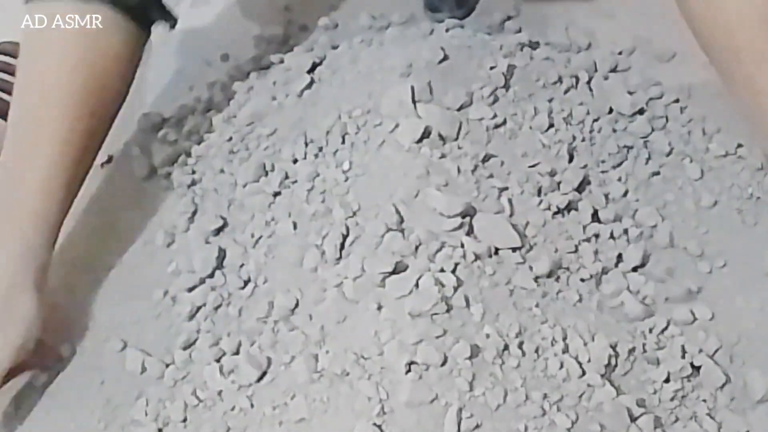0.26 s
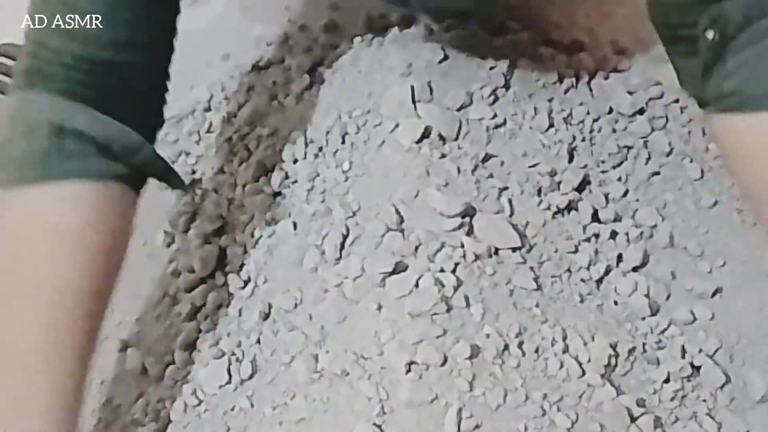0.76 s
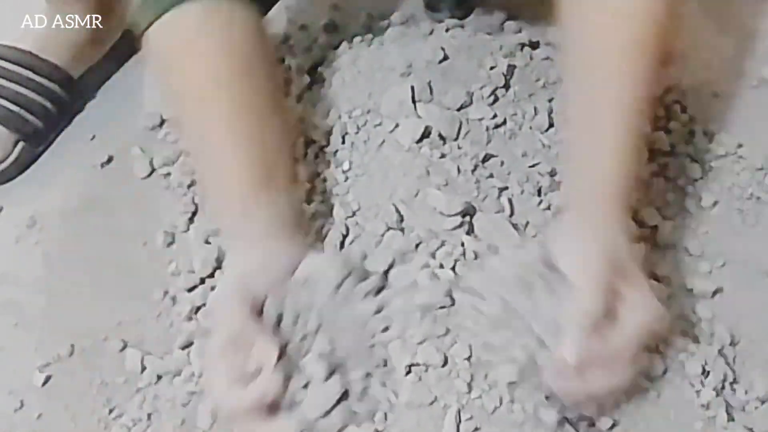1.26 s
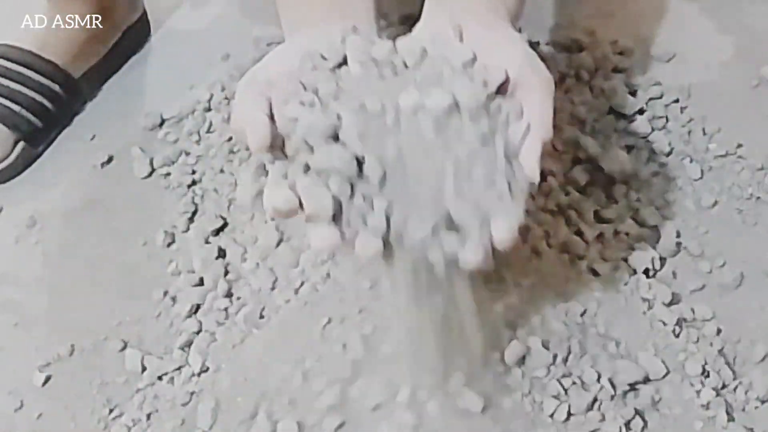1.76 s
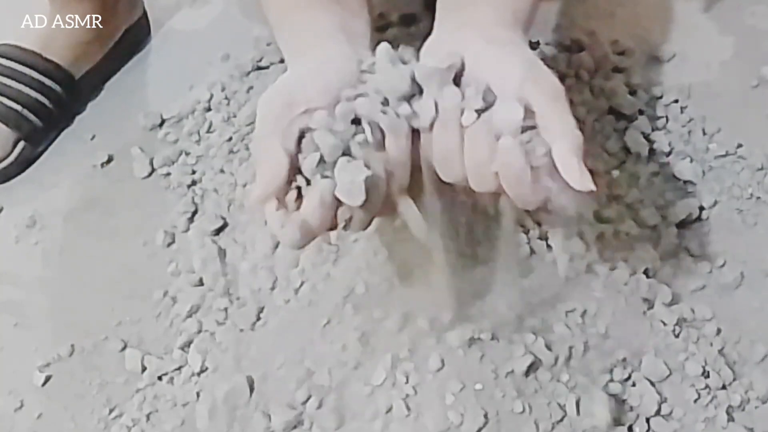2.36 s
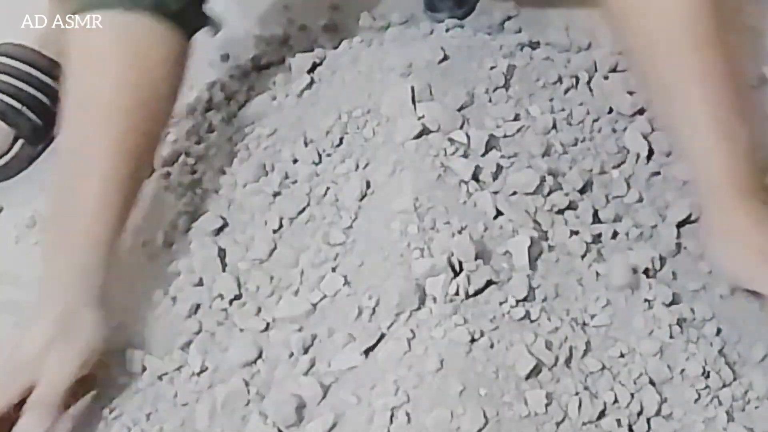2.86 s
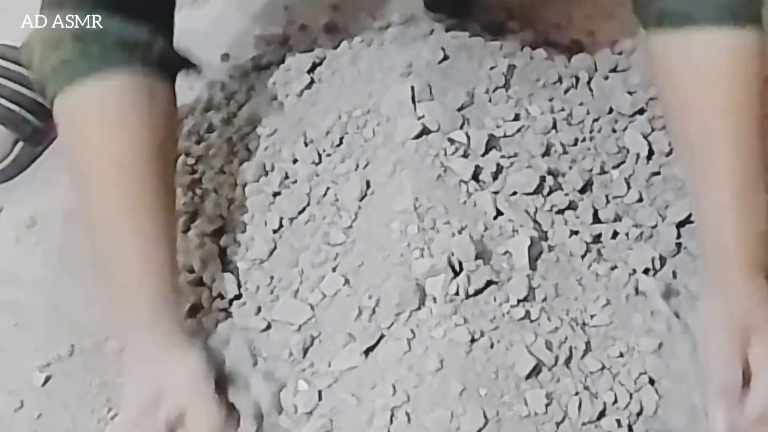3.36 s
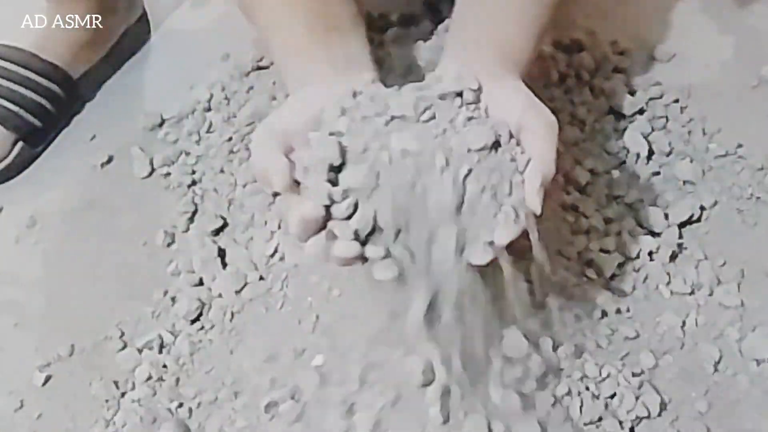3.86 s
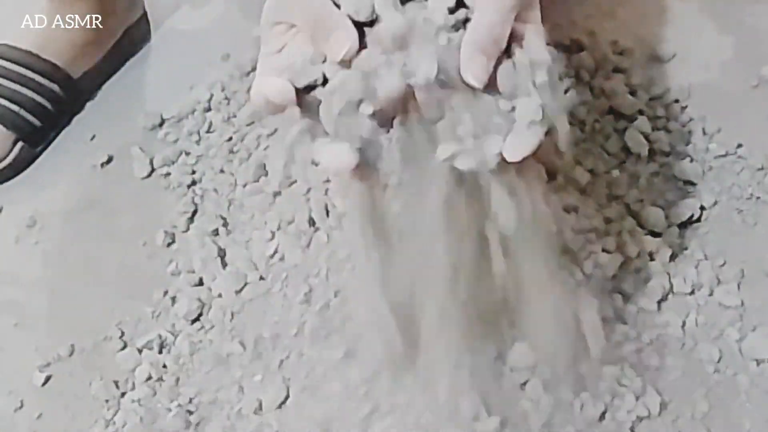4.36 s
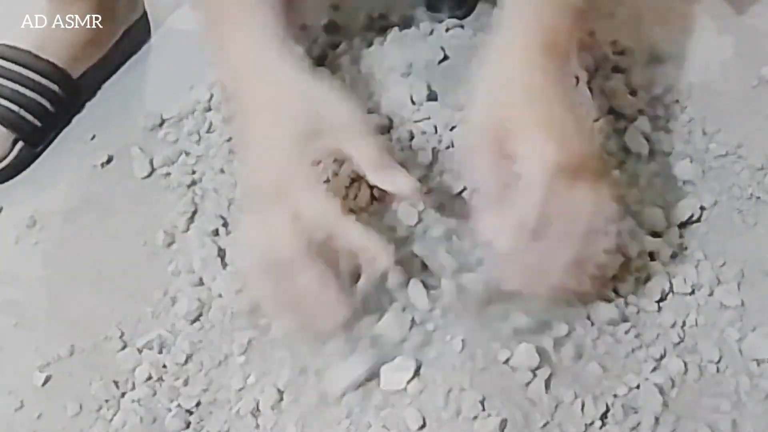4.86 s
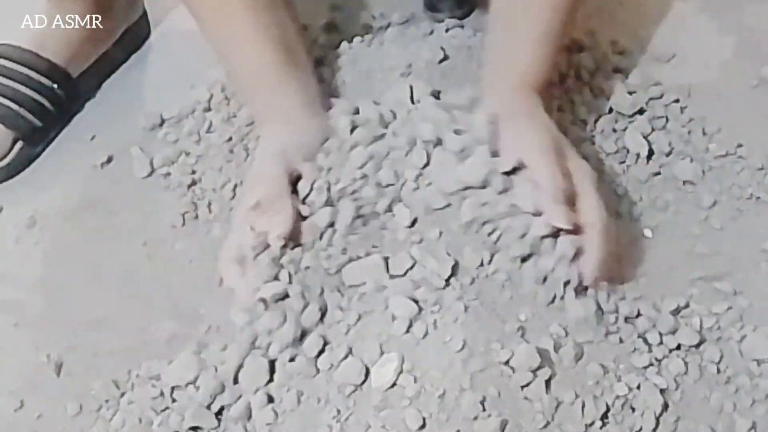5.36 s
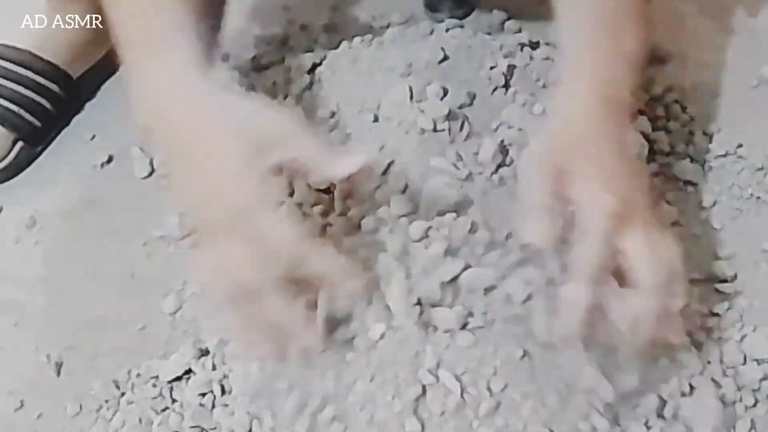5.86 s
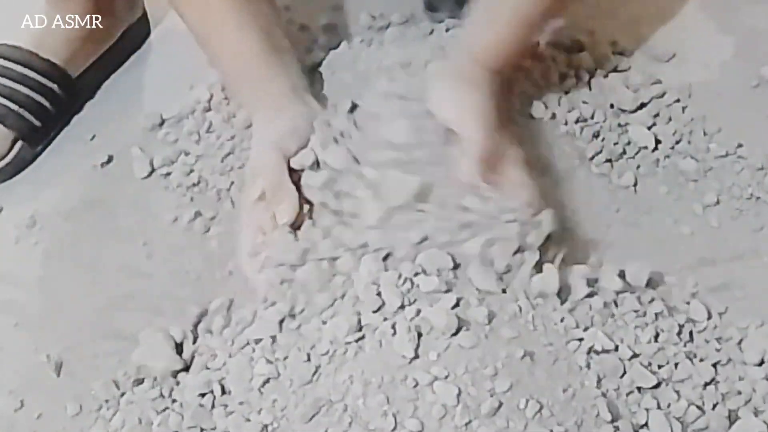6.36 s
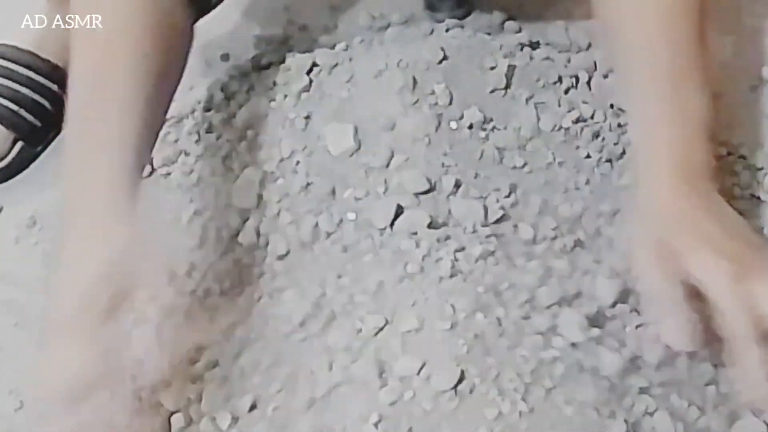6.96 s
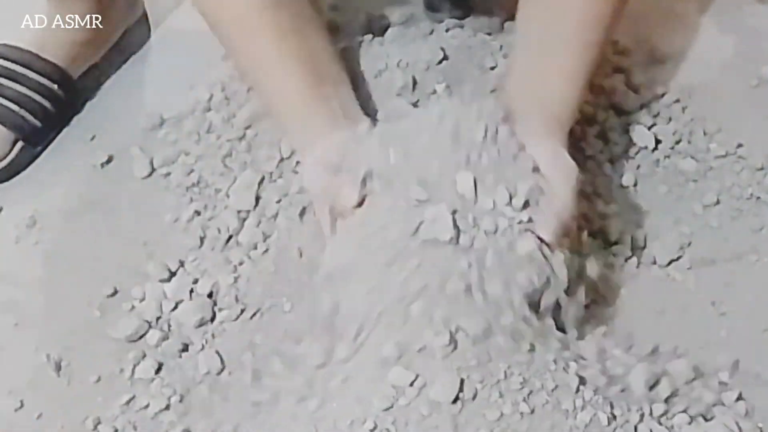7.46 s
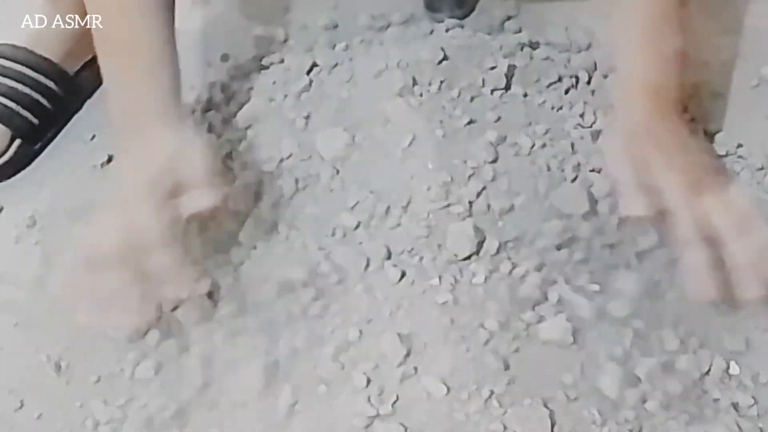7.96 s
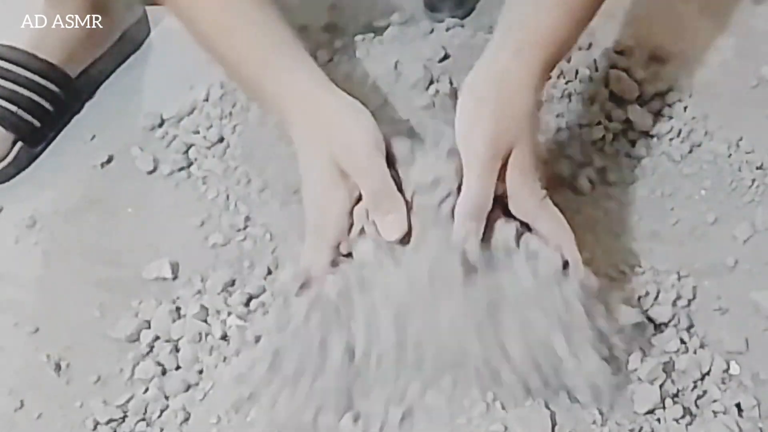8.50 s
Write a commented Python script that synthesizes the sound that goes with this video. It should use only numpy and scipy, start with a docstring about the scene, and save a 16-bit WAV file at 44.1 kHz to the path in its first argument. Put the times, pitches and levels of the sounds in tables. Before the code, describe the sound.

Two hands scrape up dry cement grit on a hard floor, crush lumps with sharp clicks, and let gritty handfuls pour back, close up indoors.

```python
"""A short spill of dry grit with sharp clicks comes first; then two hands sweep cement grit together
on a hard floor, lift it, crush the lumps and let it pour back. Random contacts of chips, grit and sand
crackle; lumps snap as sharp impulses with crumbling noise and land with hollow, decaying modes.
A phone close above the heap hears it in a small, quiet room, with a few early reflections, a faint tail
and a steady hiss."""
import sys
import numpy as np
from scipy import signal
from scipy.fft import rfft, irfft
from scipy.io import wavfile
from scipy.ndimage import map_coordinates

SR = 44100
rng = np.random.default_rng(int(sys.argv[2]) if len(sys.argv) > 2 else 0)


def master_out(mix):
    """Clip the mix to full scale and print it as 16-bit PCM to the path in sys.argv[1]."""
    frames = np.transpose(np.atleast_2d(mix))
    ceiling = np.clip(frames, -1, 1)
    pcm = np.round(ceiling * 32767).astype(np.int16)
    wavfile.write(sys.argv[1], SR, pcm)


N = 384993
TIME = np.arange(N) / SR  # seconds
BINS = np.maximum(np.arange(2049) * SR / 4096, 1)  # frequency grid in Hz

# Steady hiss behind the scene. Each row: frequency in Hz, relative level in dB.
HISS_COLOUR = [(12, -21.5), (20, 6), (32, -15.5), (64, -10), (133, -24), (289, -4), (439, -11.5),
               (881, -22), (3000, -25), (8880, -29.5), (11400, -31.5), (13100, -30), (15500, -29.5)]
HISS_DB = -65.5

# Reflections from hands, arms and floor close to the phone. One column: mean delay in seconds.
REFLECTION_DELAYS = (0.001405, 0.0026, 0.0031)

# The rest of a handful drops at once and shakes the floor. Each row: start in seconds, thud in dB,
# soft mass on the heap in dB, grit in dB.
DROPS = [(.01, -49, -60, -62), (0.978, -46, -45, -40), (2.36, -51, -31.5, -53.5),
         (5.928, -31, -23.5, -30.5)]
DROP_RISE_S, DROP_HOLD_S, DROP_FADE_S = 0.018, 0.016, 0.043
DROP_DUST_DB = -15.5  # against the sand

# Whole lumps hit the bare floor. Each row: start in seconds, level in dB.
FLOOR_HITS = [(.974, -12), (5.9302, -30), (6.2857, -26), (6.98, -25), (7.1499, -21.5), (7.3595, -17),
              (7.5152, -37.5)]
# What the bare floor rings with. Each row: frequency in Hz, relative level in dB, t60 in seconds.
FLOOR_RINGS = [(590, -8.5, 0.037), (803, -9.5, 0.047), (928, 0, 0.016), (1260, 5, 0.012),
               (1530, 1.5, 0.017), (1652, -14.5, 0.12)]

# Heavy lumps land. Each row: start in seconds, level in dB, nominal pitch in Hz.
LUMP_LANDINGS = [(0.949, -21.5, 536), (.973, -14.5, 467), (1.626, -43, 332), (2.258, -21.5, 443),
                 (2.309, -26, 469), (2.339, -24, 447), (2.361, -12.5, 422), (2.364, -20, 244),
                 (2.409, -25.5, 426), (2.612, -36, 446), (4.323, -27.5, 460), (4.432, -27.5, 456),
                 (4.445, -23, 436), (4.486, -27, 445), (4.591, -24, 425), (5.45, -46, 350),
                 (5.466, -34, 355), (5.913, -16.5, 440), (5.93, -26.5, 444), (6.055, -19.5, 465),
                 (6.092, -28, 458), (6.214, -17.5, 487), (6.249, -28, 508), (6.523, -30, 483),
                 (6.563, -33, 494), (6.981, -25.5, 457), (7.919, -32, 477), (8.03, -38, 486),
                 (8.369, -35, 438), (8.394, -32, 486)]
# What a landing rings with. Each row: nominal multiple of its pitch, relative level in dB, t60 in seconds.
LUMP_RINGS = [(.5, -17, 0.031), (.78, -14, 0.022), (1, 4, 0.069), (1.171, -3.5, 0.045), (1.45, -6, .03),
              (1.85, -9.5, 0.011), (3.7, -12, .022)]

# Dragged chips sing thinly on the floor. Each row: start in seconds, length in seconds,
# pitch midway in Hz, level before the fade shape in dB, width in Hz.
CHIP_SQUEALS = [(.57, .21, 4380, -56, 130), (.56, .17, 3200, -53, 350), (.58, .13, 5850, -61, 160),
                (.55, .19, 1380, -54, 220), (.766, .12, 2800, -50, 120), (.775, .06, 3960, -51, 140),
                (.868, .05, 1590, -28, 330), (2.861, .13, 3250, -52, 450), (3.15, .08, 1500, -33, 400),
                (6.22, .11, 3860, -47, 70), (6.225, .15, 4650, -49, 180), (6.3, .16, 4480, -54, 400),
                (6.46, .16, 4070, -57, 140)]

# Grit slides inside the cupped hands. Each row: start in seconds, length in seconds,
# pitch midway in Hz, level before the fades in dB.
CUPPINGS = [(1.303, 0.26, 1610, -60.5), (1.576, 0.49, 1760, -77), (2.046, 0.86, 1620, -60),
            (3.575, 0.24, 1440, -75), (3.861, 0.26, 1790, -75), (4.168, 0.56, 1610, -64.5),
            (5.36, 0.65, 1566, -66), (6.492, 0.2, 1620, -74), (7.498, 0.37, 1530, -67)]
# What the hollow of the hands rings with. Each row: multiple of its pitch, relative level in dB, width in Hz.
HOLLOW_RINGS = [(1, 13.5, 230), (1.85, -3.5, 450), (2.72, 2, 450)]

# Colour of crumbs on the soft heap, close below the phone. Each row: frequency in Hz, relative level in dB.
HEAP_COLOUR = [(50, -51.5), (81, -20), (118, -1.5), (172, -21.5), (215, -3), (247, 0), (303, 0.5), (386, 1),
               (446, 3), (492, -2), (626, -5.5), (698, -12.5), (797, -9), (900, -32.5), (1170, -60),
               (1980, -120)]
# Colour of the loose grit. Each row: frequency in Hz, relative level in dB.
GRIT_COLOUR = [(290, -38.5), (500, -17), (537, 2.5), (696, -10.5), (803, -6), (1290, 1), (1510, 3),
               (2200, -6.5), (2900, -2.5), (3740, -5), (6000, -12), (9000, -13.5), (11400, -16),
               (12500, -28), (15500, -24.5)]

# Big lumps snap or strike. Each row: start in seconds, level of the whole click in dB, centre in Hz,
# crumbling against the first impulse in dB, spread of the colour in octaves.
LUMP_SNAPS = [(.0116, -16, 5300, -9, .5), (.048, -13, 5100, -14, 0.53), (.167, -28, 6360, -9, 0.86),
              (.836, -8, 6440, 3, .5), (.8575, -5, 2194, -6, 0.64), (.961, 4, 2720, 3, 0.54),
              (.974, 10, 1000, 25, 0.93), (.977, -3, 1080, 20, 1.5), (.983, -2, 3000, 15, 1.1),
              (1.035, -7, 7000, -2, 0.77), (1.166, -13, 7500, 0, 0.34), (1.32, -18, 6960, 1, 0.6),
              (1.556, -28, 3400, 3, .25), (1.5794, -30, 5600, 1, 0.86), (1.652, -27.5, 4840, 1, 0.33),
              (1.91, -28, 1000, 18, 0.88), (2.016, -23.5, 8400, -6, 0.47), (2.086, -21.5, 2760, 10, 0.57),
              (2.1765, -12, 7400, -18, 0.4), (2.222, -14, 6960, -22, 0.5), (2.227, -12.5, 7900, -11, 0.49),
              (2.362, 1, 2000, 17, 1.4), (2.407, 0, 5700, 15, 1.1), (2.463, -19, 7640, -9, 0.36),
              (2.504, -4.5, 7260, -6, 1.1), (2.538, -11.5, 2700, -19, 0.78), (2.6655, -12.5, 4000, 8, 1.07),
              (2.687, -10.5, 7000, -2, 1.15), (2.798, -20, 1580, 14, 1.3), (2.863, -21.5, 3100, -13, 0.26),
              (2.892, -14.5, 3310, 12, 0.27), (3.043, -32, 3000, -5.5, 0.67),
              (3.203, -2.5, 9440, 14.5, .15), (3.3525, -9, 4460, -3, 0.87), (3.893, -27, 5360, 3, 0.77),
              (4.035, -19, 4620, 0, 0.74), (4.085, -24, 5450, 4, .6), (4.157, -17, 4060, -2, 0.53),
              (4.258, -18.5, 2890, 4, 0.5), (4.3224, -12, 6800, -17, 0.72), (4.324, -15, 1570, -1, 0.16),
              (4.3646, -14, 7150, -6, 0.62), (4.369, -8, 7900, 0, 0.83), (4.3833, -14, 8000, -6, 0.55),
              (4.431, -8, 8400, -12, 0.76), (4.5895, -12, 1595, 9, 0.31), (4.801, -18.5, 2930, 1, 1.34),
              (5.043, -38, 3600, -6, .7), (5.34, -17, 4890, 16, 0.67), (5.363, -16, 3240, -6, 0.38),
              (5.485, -19.5, 2010, -3, 1.3), (5.569, -17.5, 2030, -3, 2), (5.731, -18, 4700, 2, .8),
              (5.85, -8, 7500, -5, 0.37), (5.887, -11.5, 4400, -6, 0.38), (5.913, -18, 4030, 15, 1.3),
              (5.932, 2, 2680, 2, 0.43), (5.9475, 0, 4350, -7, 0.91), (5.962, -0.5, 3100, -29, 1.6),
              (5.973, -4, 1780, -18, 0.77), (6.034, -12, 6800, -3, 0.77), (6.104, 4, 4470, -5, 0.52),
              (6.214, -12.5, 1480, 7, 1.3), (6.43, -21, 5450, -7, 0.67), (6.487, -23, 7150, -3, 0.77),
              (6.5216, -18, 5700, -7, 0.71), (6.5885, -20, 6150, -2, 0.88), (6.661, -17, 2390, 5, 1.3),
              (6.677, -9.5, 4400, -14, 1.1), (6.7115, -14, 4250, -8, 0.66), (6.7316, -14, 6500, -1, 0.53),
              (6.749, -7.5, 3770, 3, 0.88), (6.8848, -16, 4000, -13, 0.97), (6.913, -14, 7000, -6, 0.46),
              (6.96, -7.5, 2940, 6, 0.33), (6.9795, 5.5, 8100, 22, 1.8), (7.08, -13, 3440, 3, 1.6),
              (7.1, -6.5, 5950, -18, 1.1), (7.126, -16, 7500, -10, 0.55), (7.152, -2.5, 1840, 10, .55),
              (7.186, 0, 2940, -20, 0.54), (7.36, 6, 3390, 11, 0.76), (7.4, -6.5, 8200, -9, 0.26),
              (7.514, -11, 1370, 17, 0.67), (7.777, -25.5, 6450, -3, 0.51), (7.837, -28.5, 6840, -3, 0.72),
              (7.9175, -6, 3570, -10, 0.35), (8.01, -12.5, 3950, -11, 0.36),
              (8.031, -18.5, 4540, -11, 0.97), (8.335, -25, 8400, -5, 0.46), (8.668, -19.5, 8800, -3, .5),
              (8.707, -15.5, 8840, 3, 0.44)]
LUMP_RING_OCTAVES = .05  # how narrowly a lump rings
CRUMBLE_S, CRUMBLE_TAIL_S = .0013, .0045  # decay of the first chatter and of the stragglers

# Small lumps break at random, as loud as the running sand allows.
CRUMBS_PER_S, CRUMB_DB, CRUMB_SCATTER_DB = 28, 15.5, 4  # CRUMB_DB is against the sand
CRUMB_HZ, CRUMB_SCATTER_OCTAVES, CRUMB_CHATTER_DB, CRUMB_OCTAVES = 5930, 0.4, 0, 0.9

# Hands sweep over the floor into the heap. Each row: start in seconds, rise in seconds, hold in seconds,
# chips at the first bite in dB, chips dragged on in dB, slowing of the drag in dB per second,
# grit against the chips in dB, sand against the chips in dB, dust against the sand in dB,
# soft mass of the heap in dB, length of the push in seconds.
HAND_SWEEPS = [(0.371, 0.096, 0.042, -37, -52.5, 118, 0.5, -7, -35, -48, 0.078),
               (0.788, 0.11, 0.039, -40.5, -34.5, 54.7, -0.5, -0.5, -20.5, -47, 0.22),
               (1.052, 0.028, 0.016, -46, -52.5, 67.4, 10.5, 11.5, -36, -40, 0.19),
               (3.123, 0.072, 0.083, -36.5, -42.5, 43.9, 1, -1.5, -17, -44.5, 0.47),
               (5.124, 0.044, 0.034, -42, -49.5, 27, -2.5, -9.5, -22, -47, 0.38),
               (6.147, 0.022, 0.023, -44, -48.5, 36.7, -4, -6.5, -28, -46, 0.43),
               (7.127, 0.033, 0.034, -36, -40.5, 60.3, -1, -4, -26, -40, 0.26),
               (7.343, 0.03, 0.024, -40.5, -51, 77.2, -1.5, -12.5, -15, -57, 0.092),
               (8.081, 0.08, 0.022, -47, -48.5, 60.7, -9, -11, -16, -45, 0.29)]
SWEEP_DEPTH_DB = 27.5  # a sweep starts this far down
BITE_DB_PER_S, SETTLE_DB_PER_S = 186, 76  # fall of the first bite, and of the heap after the push
DULLING_DB_PER_S = 12  # the sand falls away sooner than the chips

# Handfuls run out between the fingers. Each row: start in seconds, swell in seconds, hold in seconds,
# fade in seconds, sand in dB, coarseness in dB per size class, dust against the sand in dB,
# patter on the heap in dB.
HAND_POURS = [(0, 0.00085, 0.077, 0.1, -52.5, -1.5, -25, -51),
              (1.302, 0.22, 0.26, 0.96, -64, -2, -20, -57.5),
              (1.966, 0.23, 0.39, 0.29, -47, -2.5, -14.5, -47),
              (2.803, 0.046, 0.023, 0.13, -76, 9, -7.5, -52.5),
              (3.609, 0.27, 0.23, 0.091, -64.5, -1.5, -21.5, -54.5),
              (3.895, 0.39, 0.22, 0.5, -47, -4.5, -17, -48),
              (4.752, 0.024, 0.14, 0.074, -61.5, 0.5, -1, -56),
              (5.551, 0.33, 0.035, 0.41, -41, -2.5, -13, -40.5),
              (6.442, 0.29, 0.3, 0.35, -45.5, -1.5, -21.5, -48),
              (6.76, 0.044, 0.024, 0.13, -59.5, 13.5, -6, -48), (7.612, .12, 0.16, 0.31, -65, 2, -7, -62.5),
              (7.901, 0.019, 0.029, 0.18, -55, 2, -12, -50.5),
              (8.552, 0.17, .1, .1, -50.5, -3.5, -7, -50.5)]
POUR_DEPTH_DB = 23.5  # range of the swell and fade, for pours and drops
POUR_CHIPS_DB, FALLING_STONES_DB = -6, -2.5  # few chips in a pour, and few stones clacking

# Jammed grit gives way under the hands. Each row: centre in seconds, extra level in dB.
GRIT_SURGES = [(0.88, 6), (.929, 3.5), (1.107, 7), (3.207, 6), (7.172, 5)]
SURGE_S = 0.0067

# Pass bands from low to high edge in Hz
THUMP_BAND, STONE_BAND, CHIP_BAND = (55, 142), (620, 1100), (1100, 2400)
GRIT_BAND, SAND_BAND, DUST_BAND = (2400, 6000), (6000, 10000), (9200, 11250)
AIR_BAND = (13000, 15500)
AIR_DB = -37  # the faint top of every tick
COLOUR_SWELL_DB = 1.2  # scale of each size's own wander in level
DRAG_DENSITY = 4  # extra contacts of dragged grit, in multiples of the base rate
TOP_HZ = 15900


def undb(db):
    """Decibels to gain."""
    return 10 ** (np.asarray(db) / 20)


def unit(x):
    """Scale to rms 1."""
    return x / np.sqrt(np.mean(x ** 2))


def colour(points):
    """Gain per frequency bin, drawn through (Hz, dB) points on a log-frequency axis."""
    hz, db = np.transpose(points)
    return undb(np.interp(np.log(BINS), np.log(hz), db))


def hump(hz, octaves):
    """Gain of a resonance on a log-frequency axis."""
    return 1 / (1 + (np.log2(BINS / hz) / octaves) ** 2)


def band(lo, hi):
    """Gain of a pass band with a steep top edge."""
    return 1 / np.sqrt((1 + (lo / BINS) ** 12) * (1 + (BINS / hi) ** 22))


def high_pass(low_hz):
    """Gain of a gentle bass cut."""
    return BINS ** 2 / (BINS ** 2 + low_hz ** 2)


def response(gain):
    """The causal, minimum-phase impulse response of a gain curve, by way of the cepstrum."""
    cepstrum = irfft(np.log(gain + 1e-6))
    half = len(cepstrum) // 2
    cepstrum[1:half] *= 2
    cepstrum[half + 1:] = 0
    return irfft(np.exp(rfft(cepstrum)))


def through(x, impulse):
    """Convolve, keeping the length."""
    return signal.fftconvolve(x, impulse)[:len(x)]


def split(x, gain):
    """Filter without delay, so that the bands of one tick stay together."""
    centred = np.roll(irfft(gain), len(gain) - 1)[1:]
    return signal.fftconvolve(x, centred, mode="same")


def add(out, s, sound):
    """Mix a sound in at a time in seconds."""
    i = max(int(s * SR), 0)
    out[i:i + len(sound)] += sound[:N - i]


def wander(rate):
    """Random wander: straight lines between random normal points, rate points per second."""
    return np.interp(TIME * rate, np.arange(4096), rng.standard_normal(4096))


def contacts(rate, spread_db):
    """Random impulses of even mean power, rate per second: many small ones, a few large."""
    chance = np.clip(rate / SR, 0, 1)
    size = undb(spread_db * np.minimum(rng.exponential(size=N), 5))
    hits = rng.random(N) < chance
    return unit(hits * size * rng.choice([-1, 1], N) / np.sqrt(chance))


def resonance(hz, width_hz):
    """The dying ring of one resonance, free of bass, with unit energy."""
    t = TIME[:4096]
    ring = np.exp(-np.pi * width_hz * t) * np.sin(2 * np.pi * hz * t)
    ring = through(ring, response(band(hz / 2, 10000)))
    return ring / np.linalg.norm(ring)


def steady_hiss():
    """Coloured noise at a constant level behind everything."""
    noise = through(rng.standard_normal(N), response(colour(HISS_COLOUR)))
    return undb(HISS_DB) * unit(noise)


def room(x, early_db, wander_s, late_db, t60_s):
    """Hands, arms and floor reflect at once, over paths that shift; the walls add a faint tail."""
    t = TIME[:SR]
    early = sum(map_coordinates(x, [(TIME - delay - wander_s * wander(3)) * SR])
                for delay in REFLECTION_DELAYS)
    walls = colour([(100, 14.0), (400, 11.0), (1500, -5.0), (3200, -13.0),
                    (4400, 2.5), (5200, -5.5), (12000, -1.0)])
    late = through(rng.standard_normal(SR), response(walls))
    late = late * undb(-60 * t / t60_s) * (t > .01)
    tail = through(x, undb(late_db) * late / np.linalg.norm(late))
    return x + undb(early_db) * early + tail


def thuds(hz, t60_s, push_s):
    """The slab under the heap answers a heavy drop with a brief, deep decaying tone."""
    out, t = np.zeros(N), TIME[:8192]
    ring = np.sin(2 * np.pi * hz * t) * undb(-60 * t / t60_s) * (1 - np.exp(-t / push_s))
    for s, db, *_ in DROPS:
        add(out, s, undb(db) * ring)
    return out


def slams(low_hz):
    """A big lump excites the hard floor's modes: a short, dry clack with hardly any bass."""
    out, t = np.zeros(N), TIME[:8192]
    ring = sum(undb(db - 60 * t / t60) * np.sin(2 * np.pi * hz * t) for hz, db, t60 in FLOOR_RINGS)
    ring = through(ring, response(high_pass(low_hz)))
    for s, db in FLOOR_HITS:
        add(out, s, undb(db) * ring)
    return out


def knocks(push_s, scatter, low_hz):
    """A heavy lump gives a short push and a hollow ring, its modes detuned afresh at every landing."""
    out, t = np.zeros(N), TIME[:8192]
    for s, db, hz in LUMP_LANDINGS:
        detune = 1 + scatter * rng.standard_normal(len(LUMP_RINGS))
        ring = sum(undb(mode_db - 60 * t / t60) * np.sin(2 * np.pi * hz * ratio * d * t)
                   for (ratio, mode_db, t60), d in zip(LUMP_RINGS, detune))
        add(out, s, undb(db) * ring * (1 - np.exp(-t / push_s)))
    return through(out, response(high_pass(low_hz)))


def squeals(rise, sag):
    """Stick-slip of a sliding chip as resonant noise; it swells, dies away and sinks a little in pitch."""
    out = np.zeros(N)
    for s, length, hz, db, width_hz in CHIP_SQUEALS:
        progress = TIME[:int(length * SR)] / length
        # read the noise ever slower, so that its pitch sinks
        place = np.cumsum(1 + sag * (.5 - progress))
        tone = map_coordinates(through(rng.standard_normal(SR), resonance(hz, width_hz)), [place])
        add(out, s, undb(db) * unit(tone) * np.interp(progress, [0, rise, 1], [0, 1, 0]))
    return out


def cupped_hands(rate, rise, fall, narrowing):
    """Sliding grains ring the hollow of the hands, whose pitch climbs as they close."""
    out, grains = np.zeros(N), contacts(rate, spread_db=7.0)
    for s, length, hz, db in CUPPINGS:
        progress = TIME[:int(length * SR)] / length
        hollow = sum(undb(mode_db) * resonance(hz * ratio, width_hz)
                     for ratio, mode_db, width_hz in HOLLOW_RINGS)
        # read the ringing ever faster, so that its pitch climbs
        place = np.cumsum(1 + narrowing * (progress - .5))
        ring = map_coordinates(through(grains[int(s * SR):][:SR], hollow), [place])
        fades = np.minimum(np.minimum(progress / rise, (1 - progress) / fall), 1)
        add(out, s, undb(db) * unit(ring) * fades)
    return out


def landing(mass_db, db):
    """Grit that falls from a height also thumps faintly, as random contacts filtered to the bass."""
    bass = band(*THUMP_BAND) * hump(125, .54)
    return undb(mass_db + db) * unit(through(contacts(rate=140, spread_db=3), response(bass)))


def heap(mass_db, chips_db, dragged):
    """Crumbs patter on the soft heap at five pitches; stones clack, less where chips far outweigh the mass."""
    pitches = np.geomspace(200, 620, 5)
    rate = 40 + 60 * dragged  # contacts per second at each pitch
    patter = sum(through(contacts(rate, spread_db=2.2), response(colour(HEAP_COLOUR) * hump(hz, .45)))
                 for hz in pitches)
    clacks = through(contacts(rate=260, spread_db=1.0), response(band(*STONE_BAND)))
    stones_db = chips_db - 2.0 - 1.44 * np.maximum(chips_db - mass_db - 3.5, 0)
    return undb(mass_db) * unit(patter) + undb(stones_db) * unit(clacks)


def swell(s, rise_s, hold_s, fade_s, depth_db):
    """Level in dB of a flow that climbs through depth_db, holds, and falls through it again."""
    age = TIME - s
    before = np.maximum(1 - age / rise_s, 0)
    after = np.maximum(age - rise_s - hold_s, 0) / fade_s
    return -depth_db * (before + after)


def together(levels):
    """Add flows by their power, in dB."""
    return 10 * np.log10(sum(np.exp(np.maximum(level, -120) * np.log(10) / 10) for level in levels))


def dropping():
    """Levels of heap, chips, grit, sand and dust: a dropped handful stirs every size for a moment."""
    for s, _, mass_db, grit_db in DROPS:
        mix = np.array([mass_db, grit_db, grit_db, grit_db, grit_db + DROP_DUST_DB])
        yield mix[:, None] + swell(s - DROP_RISE_S, DROP_RISE_S, DROP_HOLD_S, DROP_FADE_S, POUR_DEPTH_DB)


def pouring():
    """Levels of heap, chips, grit, sand and dust: the fingers open, the stream runs, the hands empty."""
    for s, rise_s, hold_s, fade_s, sand_db, coarse_db, dust_db, mass_db in HAND_POURS:
        chips_db = sand_db + POUR_CHIPS_DB + 2 * coarse_db
        mix = np.array([mass_db, chips_db, sand_db + coarse_db, sand_db, sand_db + dust_db])
        yield mix[:, None] + swell(s, rise_s, hold_s, fade_s, POUR_DEPTH_DB)


def sweeping():
    """Levels of heap, chips, grit, sand and dust: the hands bite in, drag on fading, and the heap settles."""
    for (s, rise_s, hold_s, bite_db, drag_db, slowing,
         grit_db, sand_db, dust_db, mass_db, push_s) in HAND_SWEEPS:
        age = np.maximum(TIME - s, 0)
        onset = -SWEEP_DEPTH_DB * np.maximum(1 - (TIME - s) / rise_s, 0) ** 1.79
        coast = np.maximum(age - rise_s - hold_s, 0)  # seconds since the hold ended
        chips = onset + np.maximum(bite_db - BITE_DB_PER_S * coast, drag_db - slowing * coast)
        mass = onset + mass_db - SETTLE_DB_PER_S * np.maximum(age - push_s, 0)
        sand = chips + sand_db - DULLING_DB_PER_S * coast
        yield np.array([mass, chips, chips + grit_db, sand, sand + dust_db])


def surges():
    """Extra level in dB where jammed grit gives way under the hands."""
    return sum(db * np.exp(-((TIME - s) / SURGE_S) ** 2) for s, db in GRIT_SURGES)


def crumbs(sand_db):
    """Rows of small snaps at random moments, as strong as the pour that carries them."""
    chance = rng.random((300, 2))
    scatter = rng.standard_normal(chance.shape)
    rows = []
    for (s, luck), (size, pitch) in zip(chance * [TIME[-1], len(chance)], scatter):
        if luck < CRUMBS_PER_S * TIME[-1]:
            db = sand_db[int(s * SR)] + CRUMB_DB + CRUMB_SCATTER_DB * size
            hz = CRUMB_HZ * 2 ** (CRUMB_SCATTER_OCTAVES * pitch)
            rows.append((s, db, hz, CRUMB_CHATTER_DB, CRUMB_OCTAVES))
    return rows


def snaps(rows, crumble_s, tail_s, tail_db, low_hz, edge_hz):
    """A lump breaks with one impulse and rings at two random pitches; its fragments chatter for milliseconds."""
    out, t = np.zeros(N), TIME[:4096]
    reach = band(low_hz, edge_hz) ** 2 + undb(AIR_DB) * band(*AIR_BAND)
    for s, db, hz, crumble_db, octaves in rows:
        decay = np.exp(-t / crumble_s) + undb(tail_db) * np.exp(-t / tail_s)
        fragments = rng.standard_normal(len(t)) * decay
        force = undb(crumble_db) * fragments / np.linalg.norm(fragments)
        force[0] += 1  # the break itself
        rings = 1 + sum(hump(hz * 2 ** (octaves * offset), LUMP_RING_OCTAVES)
                        for offset in rng.uniform(-1, 1, 2))
        click = through(force, response(hump(hz, octaves) * rings * reach))
        add(out, s, undb(db) * click / np.linalg.norm(click))
    return out


def crackle(rate, spread_db, octaves, rub_db):
    """Grains of six sizes, each a broad, dry tick, over the even noise of rubbing dust."""
    rings = np.array([hump(hz, octaves) for hz in np.geomspace(1400, 10000, 6)])
    rings /= np.sqrt(np.sum(rings ** 2, axis=0))  # together they are flat in power
    grains = sum(through(contacts(rate, spread_db), response(ring)) for ring in rings)
    return unit(grains) + undb(rub_db) * rng.standard_normal(N)


def moving_grit(chips_db, grit_db, sand_db, dust_db, dragged):
    """Dragged chips make dense contacts and rasp; a thin pour breaks up into ticks; each size swells alone."""
    rate = 380 * (undb(np.maximum(chips_db + 55.0, 0) * .6) + DRAG_DENSITY * dragged)
    grains = crackle(rate, spread_db=4.2, octaves=.8, rub_db=-9)
    # the level flutters, and faster still while dragged
    grains = grains * undb(1.9 * wander(60) + 1.57 * dragged * wander(400))
    sizes = [(CHIP_BAND, chips_db), (GRIT_BAND, grit_db), (SAND_BAND, sand_db),
             (DUST_BAND, dust_db), (AIR_BAND, sand_db + AIR_DB)]
    out = np.zeros(N)
    for edges, db in sizes:
        level = undb(db + COLOUR_SWELL_DB * wander(35))
        out += level * unit(split(grains, band(*edges) * colour(GRIT_COLOUR)))
    return out


def scene():
    """Sweeps, pours and drops move the grit; with its snaps and knocks in the room, over a faint steady hiss."""
    poured = together(pouring())
    pushed = together([*sweeping(), *dropping()])
    poured_mass_db, poured_chips_db, _, poured_sand_db, _ = poured
    _, pushed_chips_db, *_ = pushed
    mass_db, chips_db, grit_db, sand_db, dust_db = together([poured, pushed])
    # share of the chips' power that comes from sweeps and drops
    dragged = undb(pushed_chips_db - chips_db) ** 2
    stone_chips_db = together([pushed_chips_db, poured_chips_db + FALLING_STONES_DB])

    dry = thuds(hz=92, t60_s=0.11, push_s=0.005)
    dry += slams(low_hz=477)
    dry += knocks(push_s=0.0019, scatter=0.029, low_hz=129)
    dry += squeals(rise=0.33, sag=.012)  # rise as a share of the length
    dry += cupped_hands(rate=1600, rise=0.06, fall=0.13, narrowing=0.073)  # rise and fall likewise
    dry += landing(poured_mass_db, db=-17.5)
    dry += heap(mass_db, stone_chips_db, dragged)
    dry += snaps(LUMP_SNAPS + crumbs(poured_sand_db), CRUMBLE_S, CRUMBLE_TAIL_S,
                 tail_db=-1.5, low_hz=278.0, edge_hz=11200)
    dry += moving_grit(chips_db, grit_db, sand_db, dust_db, dragged) * undb(surges())
    heard = room(dry, early_db=-16, wander_s=.0003, late_db=-19.5, t60_s=0.27)
    return (heard + steady_hiss())[None]


def record(dry):
    """The phone clips the peaks below full scale and cuts the top steeply."""
    low_pass = signal.ellip(8, .2, 70, TOP_HZ, fs=SR, output="sos")
    return signal.sosfilt(low_pass, np.clip(dry, -.85, .85))


dry = scene()
out = record(dry)
master_out(out)
```